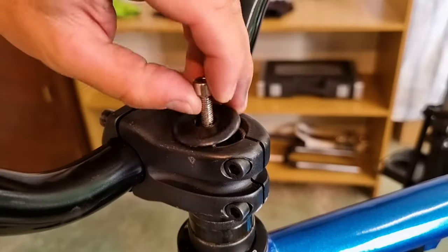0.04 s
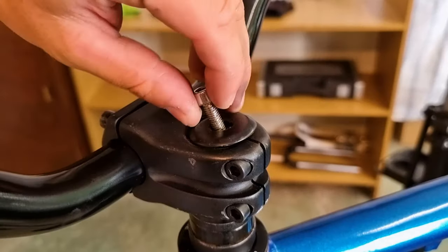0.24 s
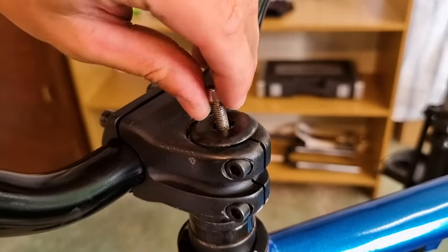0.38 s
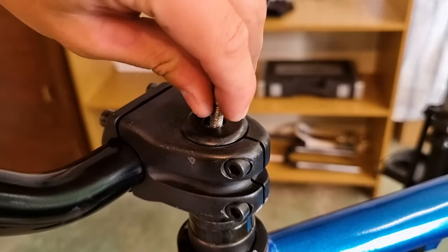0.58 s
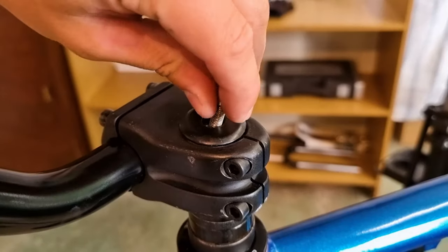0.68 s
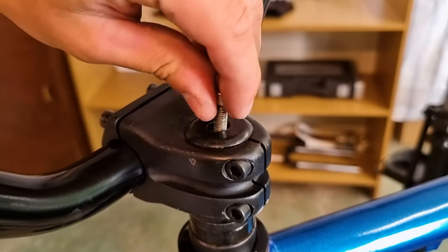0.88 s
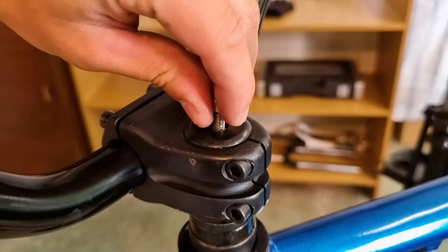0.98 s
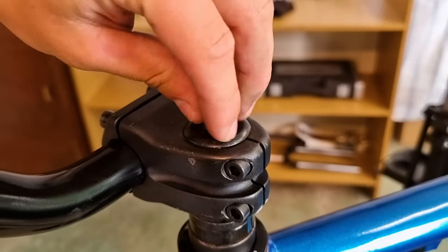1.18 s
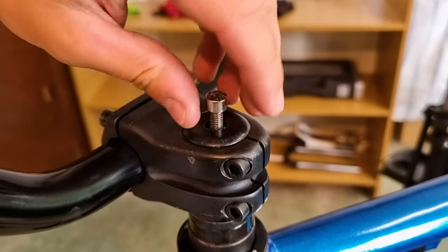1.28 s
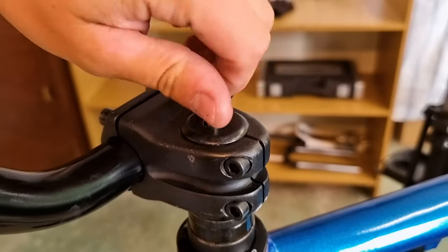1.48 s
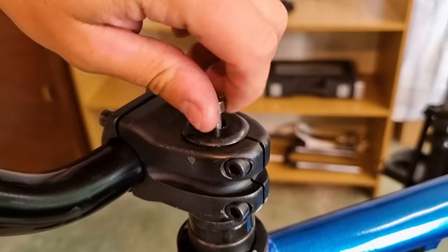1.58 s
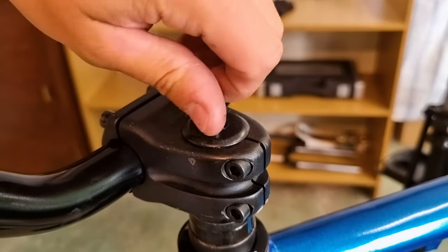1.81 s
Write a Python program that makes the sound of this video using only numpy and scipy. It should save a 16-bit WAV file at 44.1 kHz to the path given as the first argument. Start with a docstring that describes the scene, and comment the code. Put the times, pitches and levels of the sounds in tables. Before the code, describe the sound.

Sharp metallic clicks come from a cap and bolt being fitted to a bicycle stem, close up. A bright clatter at 0.2 seconds and a ping at 0.4 lead into quick knocks and tiny thread scrapes, with a small thud near 0.7. More ringing clicks follow around 0.9 and 1.1 seconds, then faint ticks and scrapes from 1.4. The small workshop adds a brief echo over a faint low throb.

```python
"""A cap knocks on a bicycle stem as fingers seat it with its steel bolt, close up in a small workshop.
The loose bolt pings in its hole, and the thread scrapes in tiny slips as it seeks the nut.
The stem and handlebar ring along with each knock, and the cap drops home with a small thud.
The room answers briefly, and a faint low throb lies underneath."""
import sys
import numpy as np
from scipy import signal
from scipy.fft import rfft, irfft, next_fast_len
from scipy.io import wavfile

SR = 44100
rng = np.random.default_rng(int(sys.argv[2]) if len(sys.argv) > 2 else 0)


def wav_record(signal):
    """Record a signal, one row per channel, as 16-bit PCM in the file named by sys.argv[1]."""
    frames = np.transpose(np.atleast_2d(signal))
    bounded = np.clip(frames, -1, 1)
    # unit amplitude maps onto the largest positive 16-bit level
    quanta = np.round(bounded * 32767).astype(np.int16)
    wavfile.write(sys.argv[1], SR, quanta)


N = 81585
LEAD_IN = SR // 4  # samples of pre-roll, so a knock can already be ringing at the start
RING = np.arange(SR // 2) / SR  # time axis of one ring-out [s]


def amp(db):
    """Decibels to linear gain."""
    return 10 ** (np.asarray(db) / 20)


def read(points, hz):
    """Joins (frequency [Hz], value) points on a log-frequency axis."""
    f, value = np.transpose(points)
    return np.interp(np.log(hz + 1), np.log(f + 1), value)


def add(mix, s, sound):
    """Lays a sound into a pre-rolled mix at s seconds."""
    part = mix[..., max(round(s * SR) + LEAD_IN, 0):][..., :sound.shape[-1]]
    part += sound[..., :part.shape[-1]]


def colour(x, *curves):
    """Minimum-phase EQ from summed (frequency [Hz], gain [dB]) curves."""
    size = 4096
    hz = abs(np.fft.fftfreq(size, 1 / SR))
    log_gain = np.log(amp(sum(read(c, hz) for c in curves)))
    response = np.exp(np.conj(signal.hilbert(log_gain)))
    taps = np.fft.ifft(response).real[:size // 2]
    return signal.fftconvolve(np.atleast_2d(x), taps[None], axes=1)[:, :x.shape[-1]]


def low_cut(x, hz):
    """Takes away the bass below hz."""
    return signal.sosfilt(signal.butter(4, hz, "high", fs=SR, output="sos"), x)


def fade(t60):
    """Falls by 60 dB in t60 seconds."""
    return np.exp(-np.log(1000) * RING / t60)


def mode(hz, t60, contact_s=.00012):
    """A decaying sine that builds up over the time of contact."""
    return np.sin(2 * np.pi * hz * RING) * fade(t60) * (1 - np.exp(-RING / contact_s))


def unit(x):
    """Scales to unit energy per channel."""
    return x / np.sqrt((x ** 2).sum(-1, keepdims=True) + 1e-20)


def room_tone():
    """Still workshop air: dark noise, centred in the bass and wider above."""
    # spectrum of the air (frequency [Hz], relative level [dB])
    spectrum = [(20, 2.5), (45, 2), (70, 8.5), (110, -12.5), (200, -13), (500, -21), (1500, -29),
                (4000, -28), (8000, -39), (16000, -45)]
    noise = rng.standard_normal((3, N + LEAD_IN))
    centre = colour(noise[:1], spectrum, [(90, -4.5), (300, -13.5)])
    sides = colour(noise[1:], spectrum, [(70, -7), (200, -1)])
    return amp(-73) * np.sqrt(N) * unit((centre + sides)[:, LEAD_IN:])


def low_throb(hz=33.3, waver=.031):
    """A faint sub-bass tone that swells, sinks and wavers in pitch, a little to the right."""
    # swells of the throb (time [s], level [dB])
    swells = [(0, -61), (.2, -58), (.53, -61.5), (.66, -94), (1.05, -83.5), (1.2, -69.5), (1.33, -62.5),
              (1.43, -85.5), (1.5, -65.5), (1.68, -82), (1.78, -66.5), (1.85, -63)]
    t = np.arange(N) / SR
    drift = np.interp(t, np.linspace(0, t[-1], 24), rng.standard_normal(24))
    phase = 2 * np.pi * np.cumsum(hz * (1 + waver * drift)) / SR
    envelope = np.sqrt(2) * amp(np.interp(t, *np.transpose(swells)))
    return envelope * np.sin(phase) * amp([[-.9], [.9]])


def workshop_reverb(x, early_db=-8.5, tail_db=-10.5, rise_s=.007):
    """Quick reflections from the hand and bicycle, then the short tail of the workshop."""
    # decay of the room (frequency [Hz], t60 [s])
    decay = [(200, .25), (800, .26), (2200, .34), (5500, .33), (10000, .25), (13000, .19), (16000, .14)]
    # colour of the reflections (frequency [Hz], gain [dB])
    room_eq = [(150, -20.5), (550, -9), (1200, -2), (2500, 0.5), (5000, -2), (8000, -4.5), (14000, 1.5)]
    early, tail = rng.standard_normal((2, 2, len(RING)))
    hz, t, bands = signal.stft(tail, SR, nperseg=256)
    bands *= np.exp(-np.log(1000) * t / read(decay, hz)[:, None])
    tail = signal.istft(bands, SR, nperseg=256)[1][:, :len(RING)]
    rise = 1 - np.exp(-(RING / rise_s) ** 2)
    response = amp(tail_db) * unit(tail * rise) + amp(early_db) * unit(early * rise * fade(t60=.08))
    return signal.fftconvolve(x, colour(response, room_eq), axes=1)[:, :x.shape[-1]]


def stereo_pair(x, lean):
    """Two close microphones: the left hears the sound first, and with lean their levels differ too."""
    # balance (frequency [Hz], left over right [dB])
    balance = [(300, -1), (580, 1), (1300, 0), (2300, 2), (5000, 5), (8000, -0.5), (14000, 0)]
    # phase between the sides (frequency [Hz], left lead [rad])
    lead = [(100, 0.86), (560, 2.08), (1300, 1.7), (2200, 1.49), (5000, 2.87), (8000, 5.33), (14000, 2.3)]
    size = next_fast_len(x.shape[-1] + LEAD_IN)
    hz = np.fft.rfftfreq(size, 1 / SR)
    side = np.array([[.5], [-.5]])
    response = amp(side * read(balance, hz) * lean) * np.exp(1j * side * read(lead, hz))
    return irfft(rfft(x, size) * response, size)[:, :x.shape[-1]]


def slip_train(length, slips_per_s=800, spread_db=3, edge_s=.009):
    """Metal sticks and slips: unevenly spaced clicks of uneven size, faded in and out."""
    gap, size, sign = rng.random((3, 128))
    at = (np.cumsum(.2 + 1.6 * gap) - gap[0]) / slips_per_s
    envelope = np.clip(np.minimum(at, length - at) / edge_s, 0, 1)
    force = np.sign(sign - .5) * amp(-spread_db * np.log(size + .03))
    slips = np.zeros(len(RING))
    slips[(at * SR).astype(int) % len(RING)] = envelope * force
    return slips


def thread_scrapes(grit_db=-7):
    """Slips of thread and cap rim rasp on the finger-damped bolt and wake the hollow of the stem."""
    # scrapes (time [s], length [s], rasp [dB], treble tilt [dB/octave], hollow [dB], hollow pitch [Hz])
    scrapes = [(0.19, 0.031, -60.5, 8, -73, 648), (0.227, 0.023, -52, 12, -49.5, 636),
               (0.296, 0.025, -55, 0.5, -69, 614), (0.37, 0.023, -55, -19, -59.5, 608),
               (0.415, 0.0255, -63.5, -3, -66, 582), (0.518, 0.048, -53.5, 4, -55, 604),
               (0.568, 0.018, -45, -0.5, -59, 565), (0.592, 0.0314, -45.5, 3, -53, 615),
               (0.632, 0.043, -54.5, 9, -51, 592), (0.779, 0.037, -50.5, 3, -49, 561),
               (0.822, 0.0282, -53, -2, -55, 520), (0.885, 0.043, -56.5, -2.5, -59, 541),
               (0.921, 0.011, -49, -5, -50.5, 529), (0.991, 0.025, -64, 1, -65.5, 542),
               (1.41, 0.045, -65.5, -3.5, -69, 532), (1.447, 0.018, -58.5, -2, -62.5, 585),
               (1.503, 0.035, -57.5, -4, -55, 529), (1.547, 0.046, -64.5, 3.5, -58.5, 506),
               (1.589, 0.035, -57, -3, -57.5, 547), (1.749, 0.029, -73.5, -0.5, -65.5, 540),
               (1.782, 0.019, -72, -14.5, -60.5, 515), (1.823, 0.032, -67.5, -3, -67.5, 542)]
    # modes rung by the scraping (frequency [Hz], relative level [dB], t60 [s])
    thread_modes = [(1291, -8.5, .04), (1352, -2.5, 0.087), (1685, 0, .02), (2024, 3.5, 0.043),
                    (2214, -2, 0.011), (2514, -7.5, 0.089), (3080, -16.5, 0.15), (3800, -12, 0.013),
                    (4950, -16.5, .04)]
    # dry grit of each slip (frequency [Hz], gain [dB])
    grit_eq = [(100, -39.5), (250, -12.5), (380, -16), (800, -17), (1400, 12), (3000, 21), (6000, 7),
               (9000, -34.5), (16000, -41.5)]
    out = np.zeros((1, N + LEAD_IN))
    body = low_cut(sum(amp(db) * mode(hz, t60) for hz, db, t60 in thread_modes), hz=970)
    grit = colour(signal.unit_impulse(len(RING)), grit_eq)[0]
    one_slip = unit(body) + amp(grit_db) * unit(grit)
    for s, length, rasp_db, tilt, hollow_db, hollow_hz in scrapes:
        slips = slip_train(length)
        rasp = signal.fftconvolve(slips, one_slip)[:len(RING)]
        rasp = colour(rasp, [(1000, 0), (8000, 3 * tilt)])
        hollow = signal.fftconvolve(slips, mode(hollow_hz, t60=.075))[:len(RING)]
        hollow = low_cut(hollow, hz=420)
        add(out, s, np.sqrt(length * SR) * (amp(rasp_db) * unit(rasp) + amp(hollow_db) * unit(hollow)))
    return out


def bolt_pings():
    """The loose bolt rings freely in the cap; where it is struck decides which modes speak."""
    # pings (time [s], then strength [dB] at each of bands_hz)
    pings = [(.2255, -36, -32, -42, -56, -54), (.3737, -43, -29, -29, -52, -42),
             (.536, -54, -50, -43, -70, -72), (.6053, -38, -28, -46, -56, -70),
             (.930, -50, -37, -50, -57, -50), (1.091, -44, -42, -47, -62, -60),
             (1.466, -60, -53, -59, -85, -75), (1.542, -66, -54, -66, -85, -76),
             (1.589, -62, -57, -52, -85, -82), (1.817, -76, -74, -63, -95, -90),
             (1.842, -70, -64, -60, -90, -88)]
    # bands of a ping's strength (frequency [Hz])
    bands_hz = (2943, 4940, 6020, 10100, 12915)
    # bolt modes (frequency [Hz])
    modes_hz = (2943, 4940, 5250, 6020, 9960, 10270, 12915, 13350)
    # ring of each mode (gain [dB], t60 [s], left over right [dB])
    modes = [(-1, .11, 2), (1, .055, 7), (-18, .25, 3), (0, .03, 6), (1, .12, 2), (0, .11, 2), (0, .03, 4),
             (-6, .02, 3)]
    out = np.zeros((2, N + LEAD_IN))
    for s, *levels in pings:
        strength = list(zip(bands_hz, levels))
        for hz, (db, t60, lean) in zip(modes_hz, modes):
            pan = amp([[lean / 2], [-lean / 2]])
            add(out, s, pan * amp(db + read(strength, hz)) * mode(hz, t60))
    return low_cut(out, hz=1230)


def stem_ring(strength):
    """Stem and handlebar ring on, each mode as hard as the knock drives its frequency."""
    # stem and handlebar modes (frequency [Hz])
    modes_hz = (590, 949, 1198, 1372, 1553, 1957, 2126, 2174, 2310, 2505, 2700, 2943, 3300, 5250)
    # ring of each mode (gain [dB], t60 [s])
    modes = [(-37, .12), (-45, .16), (-41, .14), (-37, .13), (-48, .08), (-42, .2), (-40, .21), (-45, .2),
             (-46, .18), (-45, .19), (-46, .18), (-46, .17), (-46, .22), (-44, .36)]
    ring = sum(rng.choice([-1, 1]) * amp(db + read(strength, hz)) * mode(hz, t60)
               for hz, (db, t60) in zip(modes_hz, modes))
    return low_cut(ring, hz=420)


def seat_thud():
    """The cap drops into its seat: one dull impulse."""
    # colour of the thud (frequency [Hz], gain [dB])
    thud_eq = [(40, -13), (120, -7.5), (300, -3.5), (800, -16), (1300, -28), (4000, -70)]
    return colour(signal.unit_impulse(len(RING)), thud_eq)


def cap_contact(t60, clatter_db=9.5, correlation=.58, rise_share=.022):
    """A sharp click, then a burst of clatter that is partly alike in left and right."""
    noise = rng.standard_normal((3, len(RING)))
    stereo_noise = np.sqrt(correlation) * noise[0] + np.sqrt(1 - correlation) * noise[1:]
    envelope = fade(t60) * (1 - np.exp(-RING / (rise_share * t60)))
    clatter_gain = amp(clatter_db) * t60 / .01  # clatter_db holds at a 10 ms decay; longer is louder
    return unit(signal.unit_impulse(len(RING)) + clatter_gain * unit(stereo_noise * envelope))


def cap_knocks(contact_db=-1.5, stem_db=-6, seat_s=.6626, seat_db=-13):
    """The cap knocks about on the stem, setting it ringing, and thuds once into its seat."""
    # knocks (time [s], clatter t60 [s], then strength [dB] at each of bands_hz)
    knocks = [(-0.06, 0.028, -6, -10.5, -4, -14.5, -29), (0.207, 0.015, -25, -13, -23.5, -38, -51),
              (0.217, 0.035, -5.5, -5.5, -15, -32, -38), (0.2244, 0.01, -14, 4.5, -1, 0.5, -36),
              (0.2266, 0.012, -3.5, 5, 4.5, -3, -30.5), (0.2325, 0.023, -2, -16, -5.5, -22, -46),
              (0.2424, 0.022, -11, -20, -9, -33, -32), (0.368, 0.022, -19.5, -19.5, -6, -28.5, -27),
              (0.3728, 0.032, -16.5, -12.5, -12.5, -20, -12.5), (0.5492, 0.0084, -7.5, -13, -16, -17, -49),
              (0.569, 0.01, -17, -4, -16.5, -28, -53), (0.594, 0.012, -23.5, -16, -23, -32, -55),
              (0.6064, 0.0092, -16, -8, -9.5, -17.5, -40.5), (0.6265, 0.013, -11, -12.5, -25, -27, -40),
              (0.6622, 0.011, -16, -3.5, -1.5, -11, -33), (0.809, 0.011, -5.5, -17, -25, -38.5, -64),
              (0.8865, 0.0073, -14.5, -35, -37, -24.5, -51), (0.901, 0.01, -54, -12, -26, -16.5, -38),
              (0.9153, 0.0073, -15, -20, -34, -22, -45), (0.92, 0.024, -14, -17.5, -21, -43, -51),
              (0.93, 0.014, -3.5, -21, -12.5, -20.5, -25.5), (1.0818, 0.025, -24, -16, -19.5, -42, -41.5),
              (1.0868, 0.023, -29, -18.5, -2.5, -20, -36), (1.091, 0.04, -9, -5.5, -3, -16, -20.5),
              (1.1901, 0.014, -18, -14.5, -21, -32, -68), (1.1948, 0.013, -27.5, -16.5, -20, -29.5, -65),
              (1.4575, 0.013, -19, -17, -31, -48.5, -56.5), (1.8465, 0.018, -25.5, -35.5, -41, -61, -62)]
    # bands of a knock's strength (frequency [Hz])
    bands_hz = (580, 2200, 4800, 7600, 12500)
    # colour shared by all contacts (frequency [Hz], gain [dB])
    knock_eq = [(60, -49.5), (200, -27), (330, -21.5), (450, -9), (580, 10.5), (800, -23), (1300, 6.5),
                (1650, -4), (2150, 0.5), (3000, 0), (4500, -1.5), (7500, 0), (9500, 2), (13000, 5.5),
                (16000, -6.5)]
    out = np.zeros((2, N + LEAD_IN))
    for s, t60, *levels in knocks:
        strength = list(zip(bands_hz, levels))
        add(out, s, amp(contact_db) * colour(cap_contact(t60), strength, knock_eq))
        add(out, s, amp(stem_db) * stem_ring(strength))
    add(out, seat_s, amp(seat_db) * seat_thud())
    return out


def scene():
    """Close handwork and its reverb over a bed of throb and room tone."""
    handwork = stereo_pair(cap_knocks() + thread_scrapes(), lean=True)
    bolt = stereo_pair(bolt_pings(), lean=False)
    reverb = workshop_reverb(handwork + amp(-6.5) * bolt)  # the bolt sends less into the room
    return (handwork + bolt + reverb)[:, LEAD_IN:] + low_throb() + room_tone()


def record(dry):
    """A steep high cut takes off the very top of the treble."""
    high_cut = signal.firwin(511, cutoff=16400, window=("kaiser", 9), fs=SR)
    return signal.oaconvolve(dry, high_cut[None], "same")


dry = scene()
out = record(dry)
wav_record(out)
```